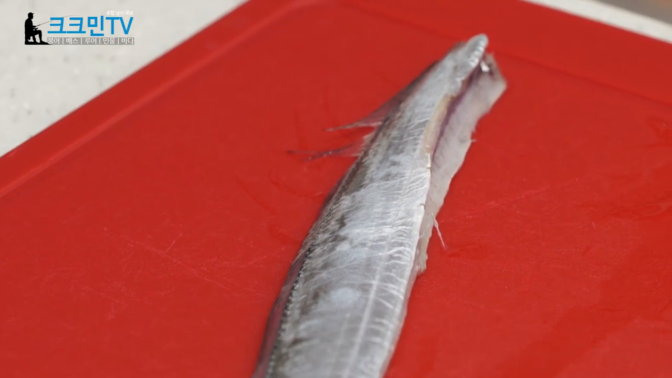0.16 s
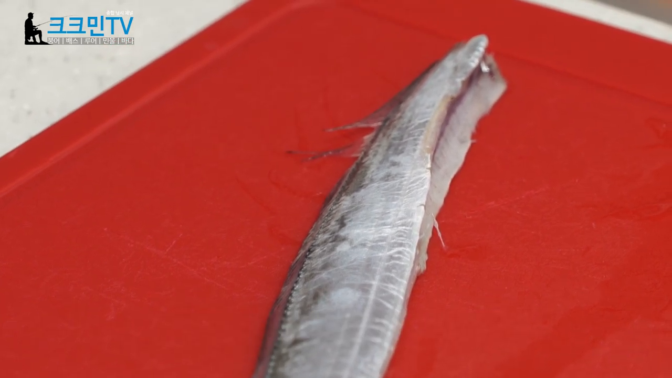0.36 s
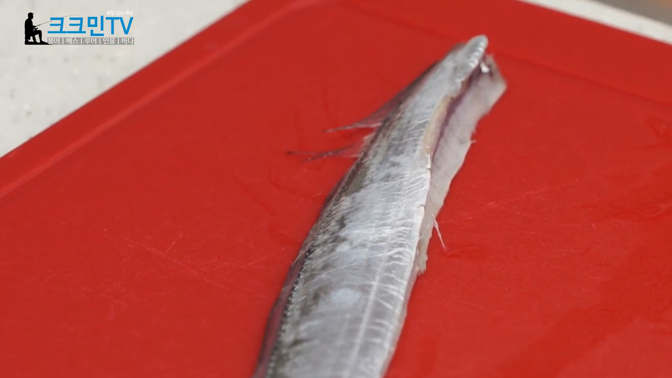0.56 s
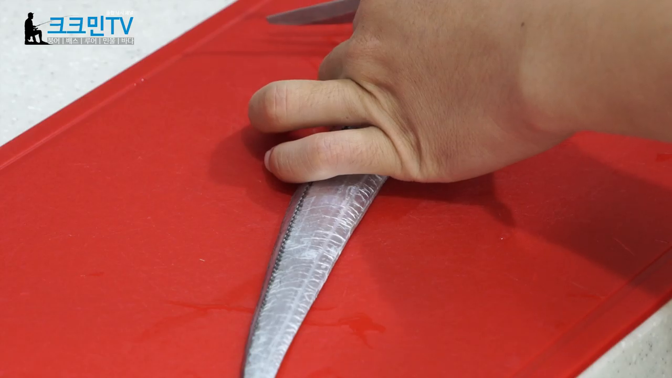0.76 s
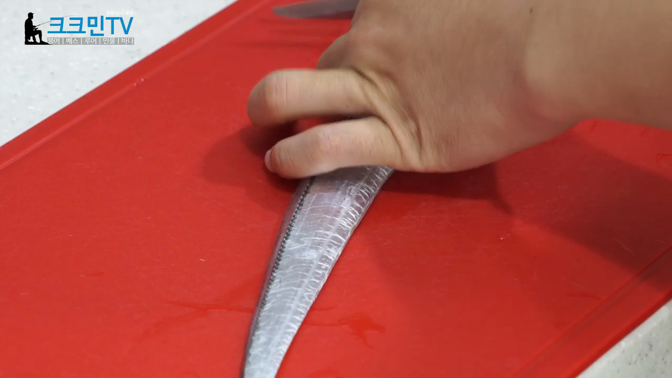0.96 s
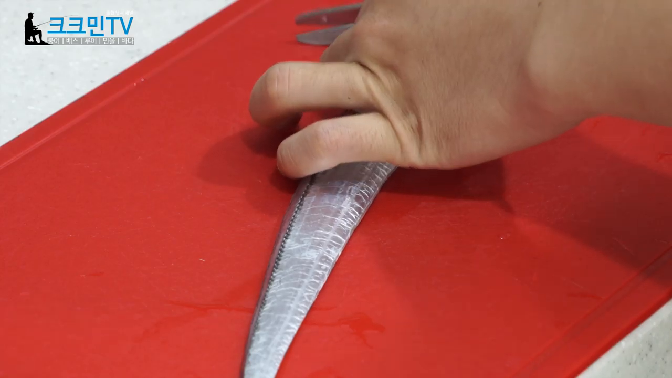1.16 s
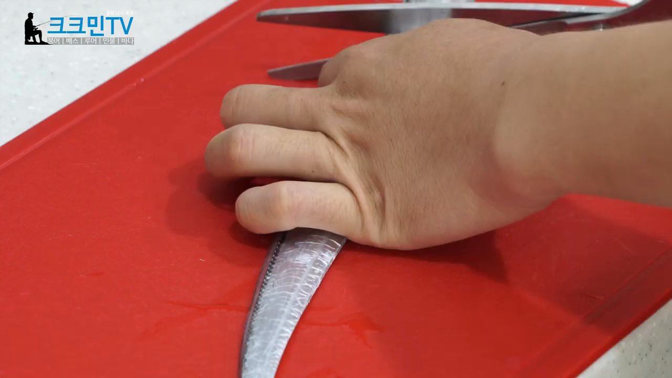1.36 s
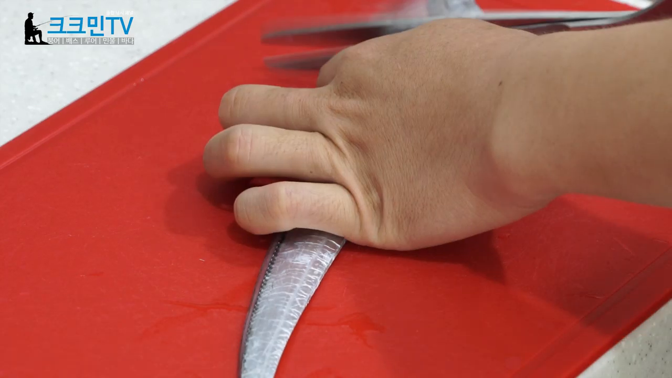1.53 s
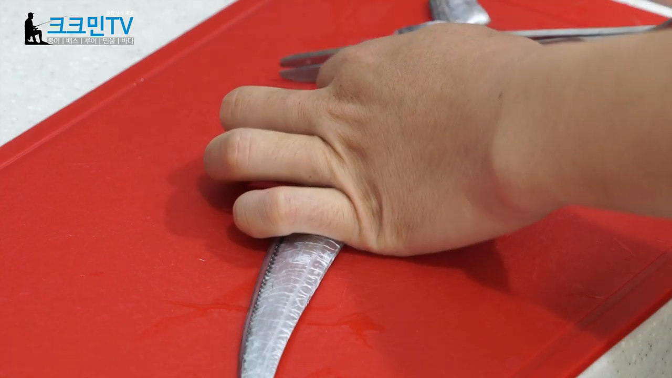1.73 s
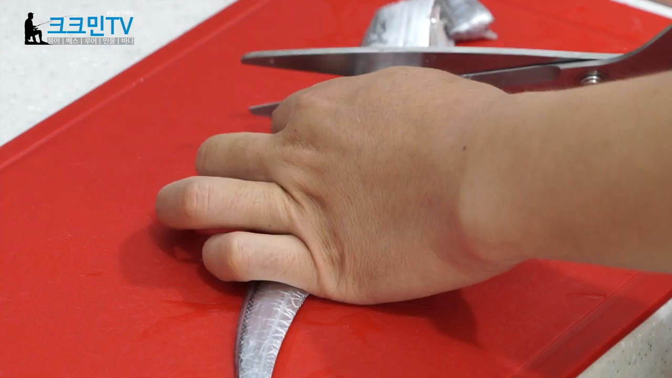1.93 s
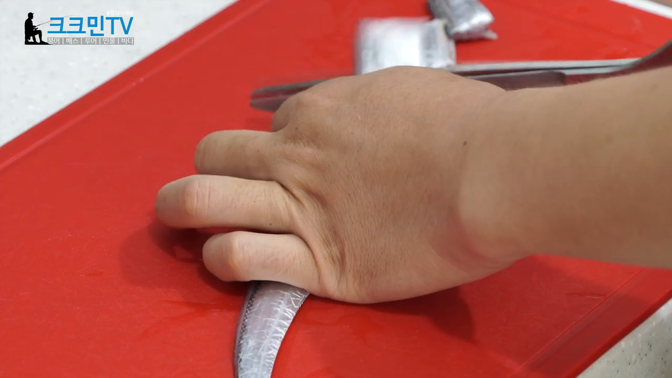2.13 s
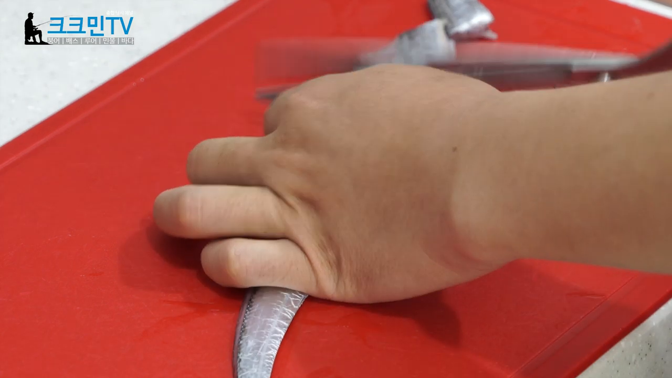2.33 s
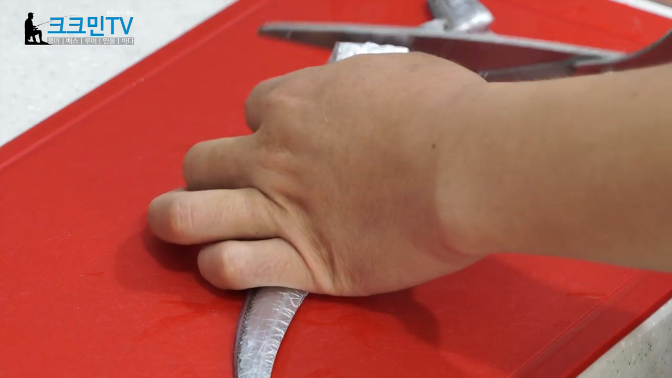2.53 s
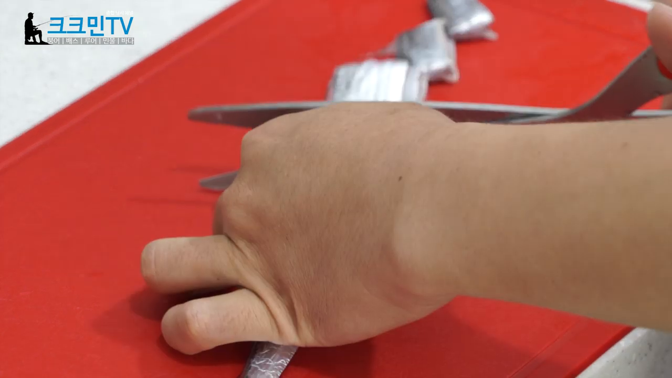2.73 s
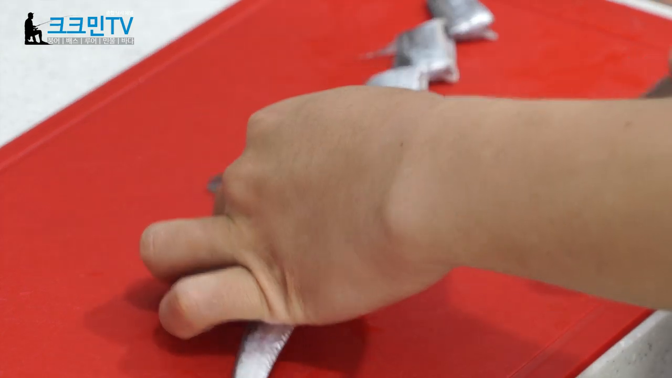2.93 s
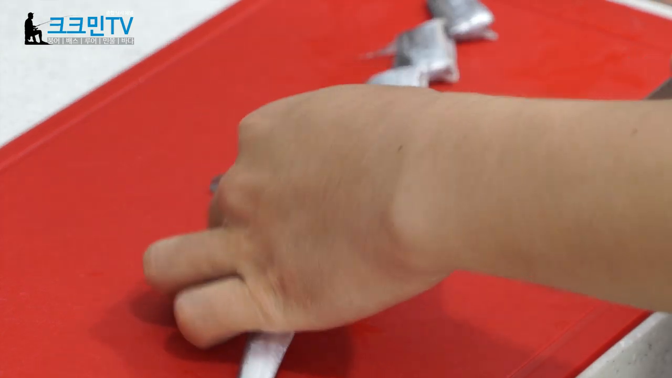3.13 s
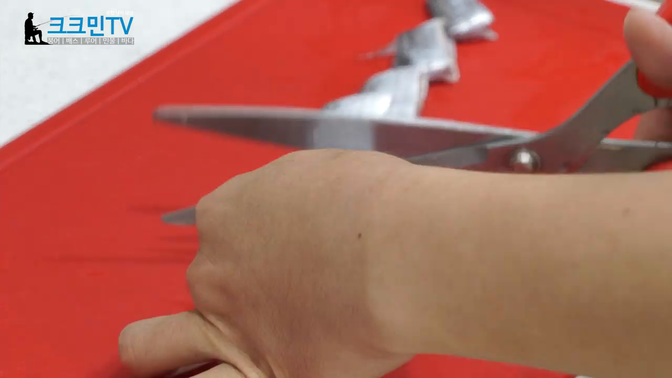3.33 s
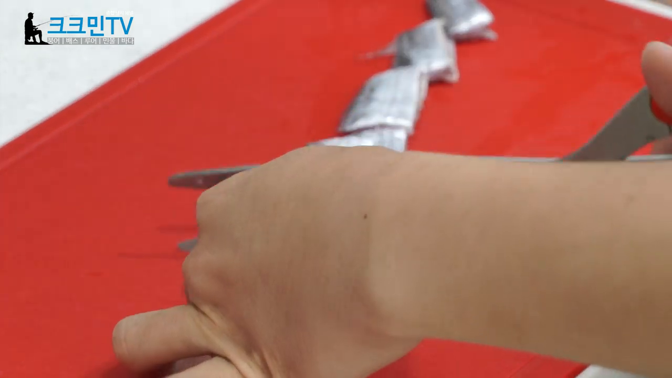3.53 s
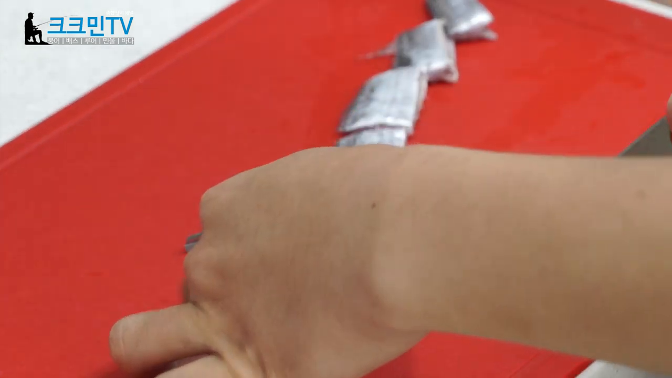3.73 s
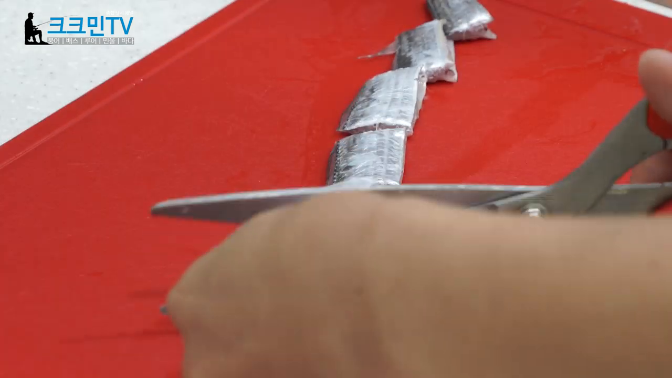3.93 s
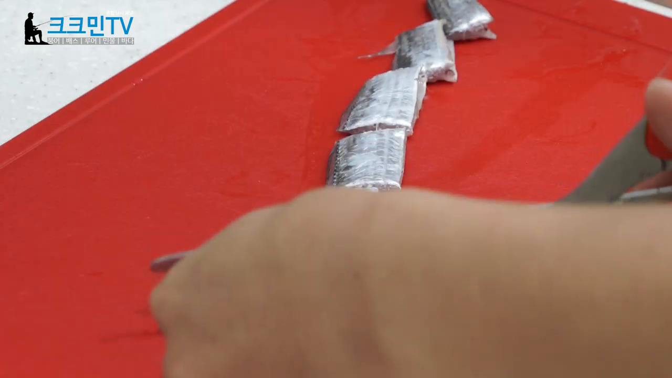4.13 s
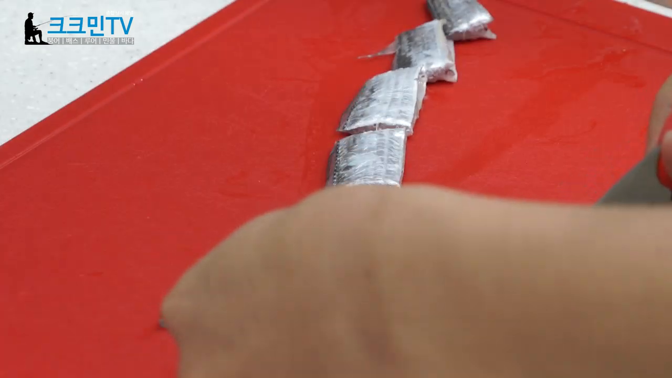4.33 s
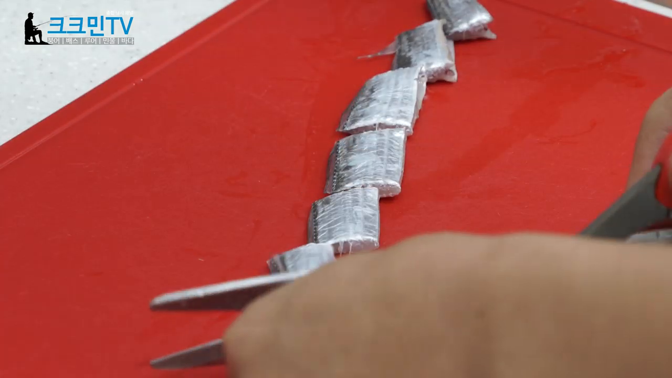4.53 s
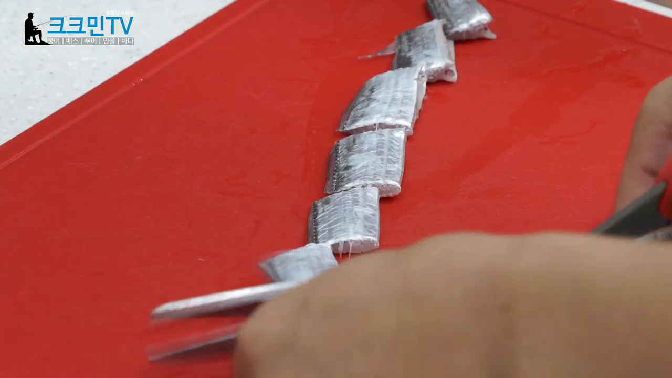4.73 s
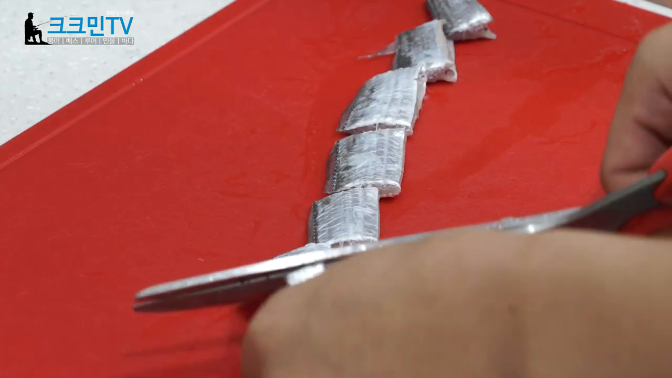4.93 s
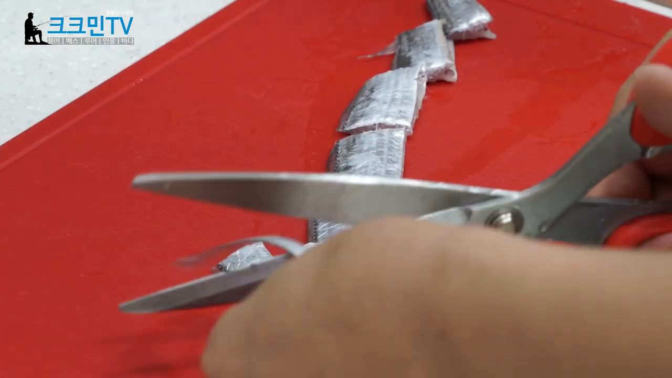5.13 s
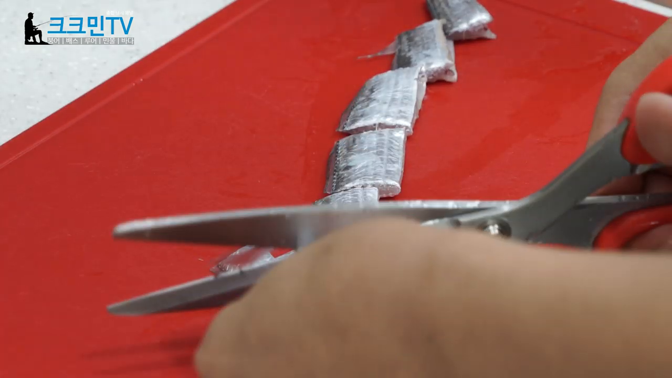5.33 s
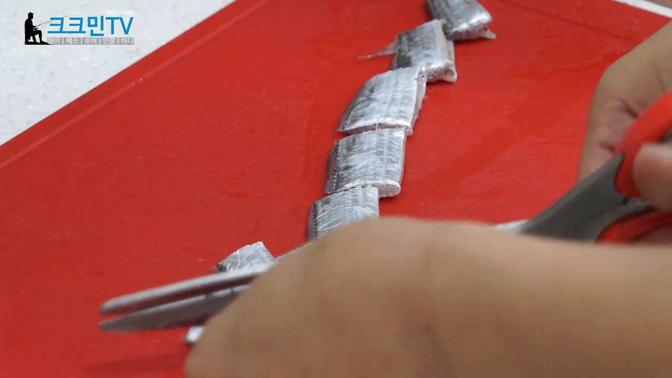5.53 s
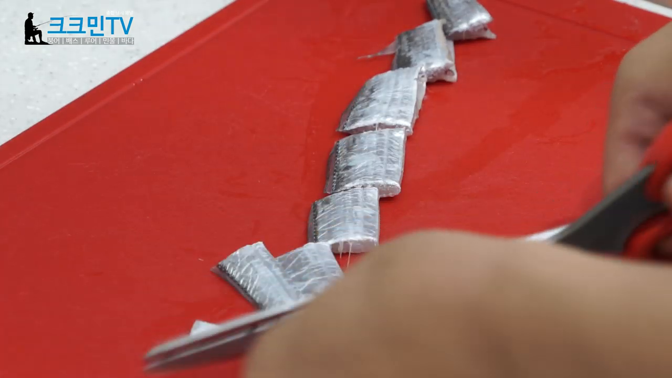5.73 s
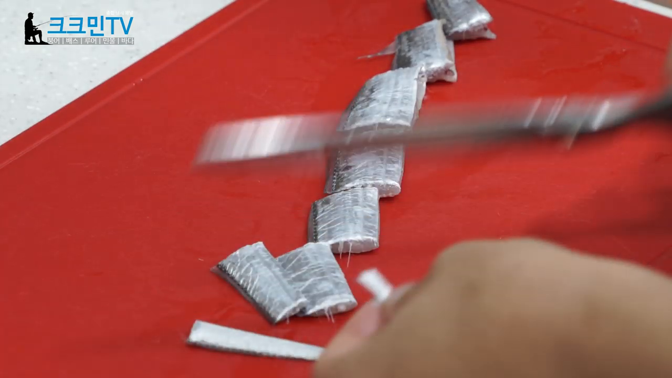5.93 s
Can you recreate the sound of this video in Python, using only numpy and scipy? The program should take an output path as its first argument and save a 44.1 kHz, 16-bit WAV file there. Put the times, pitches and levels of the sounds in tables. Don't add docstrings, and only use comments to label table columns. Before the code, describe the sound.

A low, steady room hum stands alone until about 0.7 s, when dry bone ticks begin and scissor blades slide with a thin rising metallic song. Crisp crunches break near 1.0 and 1.55 s, among small wet pops and low bumps of a hand leaning on the board. At 1.8 s the handles clack; a bright, grainy crunch at 2.15 s leaves the steel briefly ringing. Another slice rises from 2.65 s to a sharp snap at 2.9 s, with a hollow board slam. From 3.5 s fine tail bones crackle, then heavy crunch-and-slam blows land at 3.65 and 4.2 s, booming through the counter. A soft palm thump and a hard snap come around 4.7-4.8 s. Afterwards, quieter clicks and blade scrapes at 5.1-5.7 s fade into a faint wet hand slide and last light snip at 6 s. Everything is close, with a hard kitchen echo.

```python
import sys
import numpy as np
from scipy import signal
from scipy.fft import rfft, irfft
from scipy.io import wavfile
from scipy.ndimage import uniform_filter1d, minimum_filter1d

SR = 44100
rng = np.random.default_rng(int(sys.argv[2]) if len(sys.argv) > 2 else 0)


def field_ratio(decibels):
    return 10 ** (np.asarray(decibels, dtype=float) / 20)


def store_wav(level_fs):
    pcm = np.round(np.clip(np.atleast_2d(level_fs), -1, 1) * 32767)
    wavfile.write(sys.argv[1], SR, pcm.T.astype(np.int16))


N = 267687

# start_s, length_s, first_hz, last_hz, level_db
STROKES = [(0.80, 0.147, 6050, 6300, -47), (1.288, 0.18, 5900, 7100, -52), (1.46, 0.1, 7240, 7900, -50),
           (1.904, 0.17, 7700, 8600, -55), (2.659, 0.15, 6100, 7250, -45), (2.817, 0.069, 7500, 7800, -55),
           (3.468, 0.075, 6140, 6800, -44.5), (3.525, 0.13, 7500, 8370, -49),
           (4.083, 0.079, 6500, 8100, -47), (4.18, 0.032, 8350, 9000, -45), (5.295, 0.14, 6000, 6940, -51),
           (5.67, .065, 7340, 7460, -53), (5.994, 0.07, 7450, 6560, -51)]
# pitch_hz, share_db
UPPER_BANDS = [(11000, -9), (10800, -8), (10500, 2), (10800, -3), (10300, -9), (10200, -6), (10100, -8),
               (10500, -3.5), (11000, -5.5), (11300, -6), (11000, -6), (10000, -11), (9500, -8)]
# pitch_hz, width_hz, level_db
STEEL = [(3500, 700, -6), (4150, 700, -6), (4850, 400, -3), (6700, 900, -1), (8500, 500, -3),
         (10000, 600, 2), (11300, 500, -1), (12600, 500, -3), (14100, 700, -2)]
# start_s, peak_db
BODY_SLIPS = [(.781, -26), (0.7892, -11), (.864, -38), (.906, -32), (.918, -23), (2.004, -23), (2.049, -33),
              (2.34, -24), (0.8794, -25), (.912, -25), (1.353, -22.5), (1.36, -22), (1.499, -27),
              (1.919, -18.5), (1.9925, -25.5), (2.0397, -28), (2.0715, -30), (2.2694, -20), (2.655, -15),
              (2.6593, -14.5), (2.709, -32), (2.7174, -30), (2.7392, -10.5), (2.778, -21), (2.824, -19),
              (2.8783, -6), (2.883, 3)]
# start_s, peak_db
TAIL_SLIPS = [(3.485, -16.5), (3.513, -19), (3.5272, -18), (3.5324, -24), (3.552, -14), (3.557, -7.5),
              (3.5854, -38), (3.604, -15), (3.621, -13), (3.706, -10), (4.087, -37), (4.1105, -10.5),
              (4.12, -19), (4.1324, -14), (4.148, -9.5), (4.1455, -18), (4.1834, -19), (4.194, -5),
              (4.1949, -5), (5.376, -38), (5.6934, -41)]
# start_s, peak_db, brightest_hz
SPLINTERS = [(0.721, -23, 7000), (0.7529, -12.5, 4900), (0.8194, -18, 10800), (0.9566, -7, 6000),
             (0.993, -8, 8800), (0.996, -25, 8770), (1.444, -28, 3800), (1.5603, -4, 8600),
             (1.976, -30, 13600), (1.37, -35, 11700), (1.938, -24, 8000), (2.129, -17, 13800),
             (2.79, -17, 7400), (2.376, -31, 11600), (4.198, -0.5, 8700), (4.203, -7, 13500),
             (2.0934, -14, 3000), (2.108, -17, 4850), (2.13, -10, 4420), (2.146, 1, 10000),
             (2.154, 2, 10100), (2.169, -1, 11000), (2.801, -23, 10300), (2.8425, -18, 4840),
             (2.855, -18, 4600), (2.866, -28, 10400), (2.881, -25, 10100), (3.4945, -21, 10000),
             (3.522, -15, 10800), (3.6, -19, 10600), (4.0203, -13, 9100), (4.0947, -17, 11000),
             (4.136, -18, 12500), (4.6345, -22, 5940), (4.7793, -15, 9310), (4.791, -3, 9800),
             (4.796, -4, 10000)]
# start_s, peak_db, brightest_hz, low_mid_share_db
POPS = [(.824, -11.5, 5700, -9.5), (0.906, -38.5, 6200, 14), (0.9613, -10, 11500, -24),
        (0.964, -8, 4150, -3.5), (1.2285, -41, 4020, 10), (1.257, -35, 5700, 2.5), (1.281, -22.5, 5670, 1),
        (1.3992, -18, 6100, -4), (1.477, -19.5, 5340, -0.5), (1.506, -26.5, 3280, 5),
        (1.538, -15.5, 5000, -1), (1.545, -12, 7870, -6.5), (1.5697, -6, 12700, 0.5),
        (1.7336, -29, 12900, -11), (1.781, -27, 10400, -11), (2.2257, -24, 8440, -13),
        (2.7865, -30, 7400, -10), (3.098, -34, 7600, 6), (3.7217, -15, 7360, -8), (3.843, -27, 3390, -14),
        (4.2102, 0.5, 11500, -10), (4.2355, -17, 3750, 10.5), (4.8003, -8, 12500, -11),
        (4.803, -12, 2760, -8), (5.4466, -29, 11100, -5), (5.675, -27, 12000, -20)]
# start_s, peak_db
NEEDLES = [(0.9557, -11), (0.9642, -7), (1.565, -8), (2.1535, -11), (2.1535, -6), (2.1634, -5),
           (2.1704, -10), (2.885, -4), (2.8904, -2), (3.5054, -22), (3.5134, -9), (3.5224, -8),
           (3.5265, -6), (3.5284, -14), (3.532, -6), (3.5557, -11), (3.5634, -14), (3.5854, -20),
           (3.5997, -16), (3.6346, -13), (3.6353, 3), (3.6424, 1.5), (3.6484, -15), (3.6794, -14),
           (4.1314, -14), (4.136, -8), (4.1374, -15), (4.1455, -8), (4.1485, -4), (4.1544, -16),
           (4.1864, -6), (4.1929, -9), (5.4859, -16), (5.4895, -14), (5.394, -24), (5.404, -24),
           (4.7893, -3), (4.1095, -14)]
# start_s, length_s, level_db, flesh_share_db, loudest_hz
BREAKS = [
    (0.952, 0.02, -22, -18, 6150),
    (0.985, 0.014, -20, -10, 9500),
    (1.55, 0.024, -20, -6.5, 9050),
    (2.122, 0.017, -30, -20, 14100),
    (3.513, 0.0057, -32, -38, 7600),
    (3.56, .01, -34, -6, 8200),
    (3.631, 0.0062, -10.5, -8, 10300),
    (4.188, 0.017, -13, -9.5, 8750),
    (4.783, 0.015, -28, -2, 9450),
]
# start_s, length_s, level_db, flesh_share_db, loudest_hz
SQUEEZES = [(1.272, 0.007, -40, 0, 5900), (1.524, 0.0095, -32, -22, 7900), (1.806, 0.017, -36.5, -1, 9500),
            (2.148, 0.012, -8.5, -7.5, 10000), (2.335, 0.03, -31.5, 3.5, 11400),
            (2.857, 0.064, -24.5, -26, 7900), (2.877, 0.011, -11, -4.5, 12500),
            (4.128, 0.023, -27, -13, 14500), (4.497, 0.015, -26.5, -6, 11500), (5.1, 0.019, -41, 4, 9900),
            (5.131, 0.0075, -44, -4, 4100), (2.345, 0.022, -45, 1, 4700), (4.502, 0.017, -50, -14, 4800),
            (5.387, 0.014, -34.5, -11, 11300), (5.479, 0.011, -24.5, -0.3, 8160),
            (5.528, 0.0068, -34.5, 5.5, 11000)]
# pitch_hz, width_hz, level_db
FLESH = [(786, 154, 8), (1315, 32, 7), (2300, 720, -3.5), (2660, 60, 4)]
# start_s,
# length_s, level_db, pitch_hz, second_hz
RUBS = [(0.818, .012, -41, 11000, 6100), (0.878, 0.011, -48, 11000, 4000), (0.903, .015, -43, 11000, 4360),
        (1.808, 0.027, -43.5, 10800, 9200), (1.81, .02, -52, 14100, 15400),
        (1.913, .003, -47, 15000, 12900), (1.974, .012, -48, 13600, 8200), (1.992, .004, -45, 13500, 8600),
        (2.038, .017, -45.5, 8600, 13500), (2.089, .012, -39, 10000, 8500), (2.332, .028, -38, 11500, 9250),
        (2.334, 0.049, -38.5, 4730, 6630), (2.349, .03, -39.5, 2280, 11400), (2.44, .03, -49, 4700, 6000),
        (2.64, 0.07, -48, 10000, 10600), (3.473, 0.049, -40, 10100, 10300), (3.6, .012, -38, 10600, 13000),
        (4.984, .003, -53, 14000, 12500), (5.006, .003, -55, 13600, 11600),
        (5.099, 0.0028, -50, 14500, 12500), (5.1, 0.028, -46, 9900, 10300), (5.107, 0.017, -50, 5900, 2300),
        (5.132, .018, -41.5, 9800, 11300), (5.133, 0.011, -45, 5950, 4130), (5.375, .004, -48, 11000, 6500),
        (5.389, 0.011, -49, 11000, 13500), (5.452, 0.035, -50, 7500, 11200), (2.884, .01, -27, 12700, 4100),
        (4.01, .014, -44, 11500, 8500), (4.086, .028, -42, 11200, 10600), (4.505, .025, -34, 2250, 4800),
        (4.192, .012, -27, 8700, 11200), (2.66, .15, -48, 10300, 4300)]
# start_s, level_db, pitch_hz, t60_s
PINGS = [
    (2.15, -21, 10200, .24),
    (2.155, -30, 6400, 0.22),
    (4.79, -25, 9880, 0.2),
    (4.795, -31, 4400, .2),
    (3.636, -23, 9500, 0.22),
    (5.149, -37, 2120, 0.12),
    (1.834, -30, 2250, .18),
    (1.836, -36, 2850, .15),
    (3.64, -30, 6400, .2),
]
# start_s, peak_db, pitch_hz, upper_mode_share_db
CLACKS = [(1.0001, -26, 2030, 14), (1.832, -18, 2030, 4), (1.835, -24.5, 2120, 6), (2.1977, -20.5, 1920, 5),
          (2.3499, -33, 2040, 7), (2.9345, -14, 2000, 0), (3.6739, -14.5, 2040, 6), (4.2378, -8, 2000, 11),
          (4.505, -31.5, 2070, 13), (4.514, -29, 2140, 23), (4.52, -36, 2000, 5), (5.1482, -20, 1900, 6),
          (5.1515, -29, 2000, 0), (4.802, -26, 2600, 5)]
# start_s, peak_db, counter_db, board_db, ring_time_factor
LEANS = [(1.114, -9, -2, -0.5, 0.42), (1.176, -15, 5.5, -18, 0.62), (1.223, -18, -16, -23, 0.85),
         (1.259, -16.5, 5, -23, 0.91), (1.286, -14.5, -22, 0, 1.2), (1.304, -11.5, -15, -15, 1.5),
         (1.576, -11.5, -1, -24, 1.9), (1.767, -5.5, -2, -11.5, 0.64), (1.786, -20, -21, -32, 0.32),
         (1.816, -11.5, -30, -14, 0.48), (1.84, -9, -30, -35, 0.46), (2.199, -16.5, -2, -5, 1.5),
         (5.608, -30, -15, 14, 0.25)]
# start_s, peak_db, counter_db, worktop_db, ring_time_factor
SLAMS = [
    (2.927, -4.5, 0, -6, 0.1),
    (3.5, -10.5, 9.5, 0, 1.7),
    (3.556, -16, 11, -4, 1.5),
    (3.68, 8.5, -0.5, -10.5, 0.88),
    (3.752, -18, -21, -9, 0.6),
    (4.023, -19, -24, 8, 0.039),
    (4.154, -11.5, 11, -23, 0.3),
    (4.245, 6, 1, -2, 0.45),
    (4.317, -15, -8, -4, 0.94),
    (4.524, -12, 7.5, 1, 0.14),
]
# start_s, peak_db, counter_db, worktop_db, ring_time_factor
PATS = [
    (2.822, -14, 5, 7, 0.81),
    (2.984, -5, 2, 7, 0.7),
]
# pitch_hz, level_db, t60_s
COUNTER = [(44.5, -7, 0.69), (81, -4, 0.4), (206, -7, 0.19)]
# pitch_hz, level_db, t60_s
WORKTOP = [(123.1, -2, 0.51), (170.3, -6.5, 0.17), (226, 0, 0.047)]
# pitch_hz, level_db, t60_s
CABINET = [(157, -36, 0.27), (197, -2, 0.14), (262, -2.5, 0.97), (326, -6, 1), (411.7, -11.5, 0.27),
           (433.5, -8, 0.17), (491, -9.5, 0.19), (548, -24, 0.6), (607, -20, 0.13), (788, -8.5, 0.067)]
# pitch_hz, level_db, t60_s
BOARD = [(424, -6, 0.056), (735, 5.5, 0.013), (986, 7.5, 0.013), (1120, 0, 0.027), (1250, 8, 0.02),
         (1410, -15, 0.026), (1670, -10, 0.031), (2000, -9, 0.011)]
# pitch_hz, level_db, t60_s
BOARD_FLEX = [(508.5, 4.5, 0.15), (428, -7, 0.33), (588, -22, 0.31)]
# start_s, peak_db
PUSHES = [
    (4.687, -6),
    (4.728, -13),
    (4.771, -22),
]
# time_s, level_db
WIPE = [
    (5.78, -58),
    (5.86, -44.5),
    (5.93, -42),
    (6.0, -48),
    (6.07, -49.5),
]
# pitch_hz, t60_s
ROOM = [(200, 0.32), (1000, 0.51), (3000, 0.49), (8000, 0.44), (15000, 0.25)]
# pitch_hz, level_db
HUM = [(15, -19.5), (25, 16), (97, -6.5), (127, -2), (195, -11.5), (277, -4), (363, -17.5), (427, -8),
       (624, -14.5), (754, -16.5), (936, -19), (3160, -28), (4870, -29), (5730, -29), (16000, -34)]
# pitch_hz, width_hz, level_db
APPLIANCES = [(60.7, 51, -46.5), (122, 6.9, -47.5), (183, 41, -52.5), (248.6, 11, -51.5),
              (279.3, 1.1, -51.5), (324.6, 46, -49), (400.2, 4.4, -55.5), (443, 14, -59.5), (741, 7.3, -56)]
# time_s, gain_db
DRIFT = [(0, 0.9), (.7, 0.7), (1.2, 3), (3.3, 3.5), (3.9, 5.5), (4.999, 3), (6.07, 2)]


def evened(x):
    return x / np.sqrt(np.mean(x ** 2) + 1e-20)


def read(points, hz):
    f, value = np.transpose(points)
    return np.interp(np.log(hz + 1), np.log(f + 1), value)


def add(mix, s, sound):
    part = mix[round(s * SR):][:len(sound)]
    part += sound[:len(part)]


def resonate(x, hz, width):
    r = np.exp(-np.pi * width / SR)
    return 2 * signal.lfilter([1 - r], [1, -r * np.exp(2j * np.pi * hz / SR)], x).real


def resonate_twice(x, hz, width, second_hz, second_width):
    return resonate(resonate(x, hz, width), second_hz, second_width)


def follow(x, hz, width):
    turn = np.exp(2j * np.pi * np.cumsum(hz) / SR)
    r = np.exp(-np.pi * width / SR)
    return 2 * (turn * signal.lfilter([1 - r], [1, -r], x / turn)).real


def body(x, peaks):
    return sum((-1) ** k * field_ratio(db) * resonate(x, hz, width) for k, (hz, width, db) in enumerate(peaks))


def gripped(peaks):
    luck = 2 * rng.random((len(peaks), 2)) - 1
    return [(hz * (1 + .03 * a), width, db + 3 * b) for (hz, width, db), (a, b) in zip(peaks, luck)]


def above(x, hz):
    return signal.sosfilt(signal.butter(2, hz, "high", fs=SR, output="sos"), x)


def ring(modes, t, spread_db):
    luck = 2 * rng.random((len(modes), 2)) - 1
    return sum(field_ratio(db + spread_db * a - 60 * t / t60) * np.sin(2 * np.pi * hz * (1 + 0.0058 * b) * t)
               for (hz, db, t60), (a, b) in zip(modes, luck))


def song_hz(s):
    start, length, first_hz, last_hz, _ = np.transpose(STROKES)
    times = np.ravel([start, start + length], "F")
    return np.interp(s, times, np.ravel([first_hz, last_hz], "F"))


def blades():
    line_width, upper_width, top_hz, top_db = 140, 650, 14100, -24
    catch_gain, catch_s = 2.1, 0.018
    out = np.zeros(N)
    at, slip_db = np.transpose(BODY_SLIPS + TAIL_SLIPS)
    for (s, length, _, _, db), (upper_hz, upper_db) in zip(STROKES, UPPER_BANDS):
        t = s + np.arange(0, length, 1 / SR)
        hz = song_hz(t)
        late = (t[:, None] - at) / catch_s
        catch = (field_ratio(0.79 * (slip_db + 12.0)) * np.exp(-late ** 2)).max(axis=1)
        a, b, c = rng.standard_normal((3, 12000))[:, :len(t)]
        slips = signal.lfilter([1], [1, -.98], np.maximum(c - 2.6, 0))
        pressure_db = 3.5 * evened(uniform_filter1d(c, 400))
        grit = evened(0.62 + slips) * field_ratio(pressure_db)
        scrape = b * grit
        line = follow(a * (.55 + grit), hz, line_width)
        line = evened(follow(line, hz, 3 * line_width))
        upper = evened(resonate_twice(scrape, upper_hz, upper_width, upper_hz, upper_width))
        top = evened(resonate_twice(scrape, top_hz, upper_width, top_hz, upper_width))
        rub = field_ratio(3.0) * evened(above(scrape, 2000) + body(scrape, STEEL))
        song = line + field_ratio(upper_db) * (upper + field_ratio(top_db) * top + rub)
        add(out, s, field_ratio(db) * (.5 + catch_gain * catch) * song * signal.windows.tukey(len(t), .1))
    return out


def ticks():
    slip_low_db, splinter_low_db = -40, -28
    out, t = np.zeros(N), np.arange(1600) / SR
    rows = [(s, db, song_hz(s), slip_low_db) for s, db in BODY_SLIPS + TAIL_SLIPS]
    rows += [(*row, splinter_low_db) for row in SPLINTERS]
    rows += POPS
    decay = field_ratio(-60 * t / 0.0032) + 0.22 * field_ratio(-60 * t / 0.038)
    shape = decay * np.minimum(t / 0.00037, 1)
    for s, db, hz, low_db in rows:
        puff = rng.standard_normal(len(t)) * shape
        bright = 0.42 * above(above(puff, 2400), 2400) + 2.46 * resonate(puff, hz, 1500)
        bright = bright + 0.096 * body(puff, gripped(STEEL))
        bright = bright + 0.6 * resonate_twice(puff, 4300, 1900, 4300, 1900)
        bright = bright + 1.06 * resonate(puff, 10170, 800) + 0.6 * resonate(puff, 13260, 800)
        low = resonate(puff, 1460, 3800)
        snap = bright / abs(bright).max() + field_ratio(low_db) * low / abs(low).max()
        add(out, s - .0005, field_ratio(db - 1.5) * snap)
    return out


def needles():
    out, t = np.zeros(N), np.arange(300) / SR
    for s, db in NEEDLES:
        puff = rng.standard_normal(len(t)) * field_ratio(-60 * t / .0012)
        snap = above(puff, 3700) + 0.4 * body(puff, STEEL)
        add(out, s, field_ratio(db - 2.5) * snap / abs(snap).max())
    return out


def crunches():
    out, t = np.zeros(N), np.arange(3500) / SR
    hz = np.fft.rfftfreq(len(t), 1 / SR)
    rows = [(0.011, 520, *row) for row in BREAKS]
    rows += [(row[1], 670, *row) for row in SQUEEZES]
    for rise, fall, s, length, db, flesh_db, peak_hz in rows:
        tilt_db = -2 + 0.033 * flesh_db
        hiss, place, size = rng.standard_normal(len(t)), rng.random(len(t)), rng.exponential(1, len(t))
        grains = (place < 450 / SR) * field_ratio(5 * np.minimum(size, 3))
        bursts = signal.lfilter([1], [1, -.95], grains)
        fading_db = -fall * np.maximum(t - length, 0) - 0.15 * np.minimum(t / length, 1)
        shape = np.minimum(t / max(rise, .0005), 1) * field_ratio(fading_db)
        drive = hiss * evened(8.6 + bursts) * shape
        bright = .8 * above(drive, 2800) + 1.3 * body(drive, gripped(STEEL))
        bright = bright + 2.2 * resonate(drive, peak_hz, 700)
        bright = irfft(rfft(bright) * field_ratio(tilt_db * np.log2(np.maximum(hz, 500) / 8000)), len(t))
        meat = body(drive, gripped(FLESH)) + .35 * resonate(drive, 2400, 2500)
        scale = np.sqrt(np.mean(shape ** 2))
        add(out, s, field_ratio(db) * scale * (evened(bright) + field_ratio(flesh_db) * evened(meat)))
    return out


def rubs():
    out, width = np.zeros(N), 440
    for s, length, db, *bands in RUBS:
        a, b = rng.standard_normal((2, 3000))
        count = int(np.clip(length * SR, 40, 2600))
        grit = a * (.4 + abs(uniform_filter1d(b, size=40)) * 6)
        drive = np.pad(grit[:count] * signal.windows.tukey(count, .3), (0, 300))
        sound = sum(resonate_twice(drive, hz, width, hz, 2 * width) for hz in bands)
        add(out, s, field_ratio(db) * evened(sound))
    return out


def pings():
    out, t = np.zeros(N), np.arange(8000) / SR
    for s, db, hz, t60 in PINGS:
        width = .09 * hz
        tone = evened(resonate_twice(rng.standard_normal(len(t)), hz, width, hz, 2 * width))
        add(out, s, field_ratio(db - 60 * t / t60) * tone * np.minimum(t / .002, 1))
    return out


def clacks():
    out, t = np.zeros(N), np.arange(6000) / SR
    for s, db, hz, upper_db in CLACKS:
        noise = rng.standard_normal(len(t))
        crack = field_ratio(-60 * t / 0.019) * noise + 8 * (t == 0)
        chatter = crack + 0.38 * field_ratio(-60 * t / 0.16) * noise
        pair = resonate(chatter, hz, 150) + field_ratio(upper_db) * resonate(chatter, hz * 1.088, 120)
        knock = 1.28 * resonate(pair, hz * 1.02, 920)
        knock = knock + 1.06 * resonate_twice(crack, 810, 380, 950, 1560)
        knock = knock + 0.21 * resonate(chatter, hz * 1.3, 310)
        knock = knock + 0.2 * resonate_twice(crack, 2200, 4000, 2600, 5500)
        add(out, s, field_ratio(db + 7.0) * knock / abs(knock).max())
    return out


def thuds():
    hard_hz, padded_hz = 6000, 356
    out, t = np.zeros(N), np.arange(16000) / SR
    # polarity, top Hz, start s, peak dB, then counter, worktop, cabinet and board dB, ring time factor
    rows = [(-1, hard_hz, s, db, low_db, 0, -12.5, board_db, free) for s, db, low_db, board_db, free in LEANS]
    for blows, hz in (SLAMS, hard_hz), (PATS, padded_hz):
        rows += [(1, hz, s, db, low_db, top_db, 0, -11, free) for s, db, low_db, top_db, free in blows]
    for sign, hz, s, db, counter_db, worktop_db, cabinet_db, board_db, free in rows:
        rattle = resonate(rng.standard_normal(len(t)), 260, 162) * field_ratio(20.5 - 60 * t / 0.14)
        sound = field_ratio(counter_db) * ring(COUNTER, t, 0.27) + field_ratio(worktop_db) * ring(WORKTOP, t, 2.3)
        sound = sound + field_ratio(cabinet_db) * (ring(CABINET, t, 1.5) + rattle)
        sound = sound + field_ratio(board_db) * ring(BOARD, t, 2.5)
        sound = sound + field_ratio(cabinet_db - 11 + 0.66 * db) * ring(BOARD_FLEX, t, 2.3)
        sound = signal.sosfilt(signal.butter(2, hz, fs=SR, output="sos"), sound)
        settling = field_ratio(-18 * (t / (0.22 * np.clip(free, .05, 1.7))) ** 2)
        add(out, s, sign * field_ratio(db - 12.5) * sound * settling * np.minimum(t / 0.00052, 1))
    return out


def pushes():
    out, t = np.zeros(N), np.arange(9000) / SR
    turns = np.cumsum(101 * np.exp(-27 * t)) / SR
    thump = np.sin(2 * np.pi * turns) * np.minimum(t / 0.0085, 1)
    for s, db in PUSHES:
        add(out, s, field_ratio(db - 60 * t / 0.085) * thump)
    return out


def wipe():
    s, db = np.transpose(WIPE)
    rub = evened(resonate_twice(rng.standard_normal(N), 2200, 3300, 2600, 5000))
    return rub * field_ratio(np.interp(np.arange(N) / SR, s, db, -120, -120))


def kitchen(x):
    out, turn = np.zeros(N), np.arange(N) / SR * 2.356
    for k in range(3):
        taps, at = np.zeros(SR // 2), np.arange(130, SR // 2 - 12, 12)
        taps[at + rng.integers(0, 12, len(at))] = rng.choice([-1., 1.], len(at))
        hz, t, z = signal.stft(taps, SR, nperseg=256)
        tail = signal.istft(z * field_ratio(-60 * t / read(ROOM, hz)[:, None]), SR, nperseg=256)[1]
        window = np.sqrt(2 / 3) * np.cos(np.pi * (turn + k / 3))
        out += signal.oaconvolve(x * window, tail / np.linalg.norm(tail))[:N]
    return out


def hum():
    hz, t, z = signal.stft(rng.standard_normal(N + 2048), SR, nperseg=2048, noverlap=1536)
    patches_db = uniform_filter1d(rng.standard_normal(z.shape), 12, 0)
    patches_db = evened(uniform_filter1d(patches_db, 6, 1))
    shaped = z * field_ratio(read(HUM, hz)[:, None] + patches_db)
    air = signal.istft(shaped, SR, nperseg=2048, noverlap=1536)[1][:N]
    tones = sum(field_ratio(db) * evened(resonate(rng.standard_normal(N), f, w)) for f, w, db in APPLIANCES)
    return field_ratio(-38.5) * evened(air) + tones


def scene():
    steel = blades() + ticks() + needles() + crunches() + rubs() + pings()
    handles = clacks()
    board = thuds() + pushes()
    wet = kitchen(field_ratio(-10.5) * steel + field_ratio(-16.0) * handles + field_ratio(-13.0) * board)
    drift = field_ratio(np.interp(np.arange(N) / SR, *np.transpose(DRIFT)))
    return (steel + handles + board + wet + wipe() + drift * hum())[None]


def low_pass(x):
    return signal.sosfilt(signal.butter(12, 16800, fs=SR, output="sos"), x)


def record(dry):
    limit_db, recover_db_per_s = -3.2, 127
    treble_cut = signal.firwin(255, 15750, window=("kaiser", 4.5), fs=SR)
    heard = signal.oaconvolve(above(dry[0], 71.0), treble_cut, "same")
    peak_db = 20 * np.log10(-minimum_filter1d(-abs(heard), size=61) + 1e-9)
    fall_db = np.arange(N) * recover_db_per_s / SR
    held_db = np.maximum.accumulate(peak_db + fall_db) - fall_db
    over_db = np.maximum(held_db - limit_db, 0)
    ducked = heard / field_ratio(.85 * uniform_filter1d(over_db, size=41))
    return low_pass(ducked[None])


dry = scene()
out = record(dry)
store_wav(out)
```